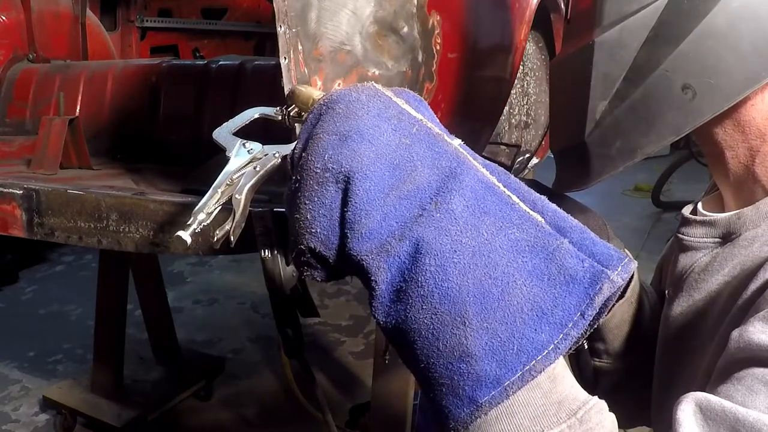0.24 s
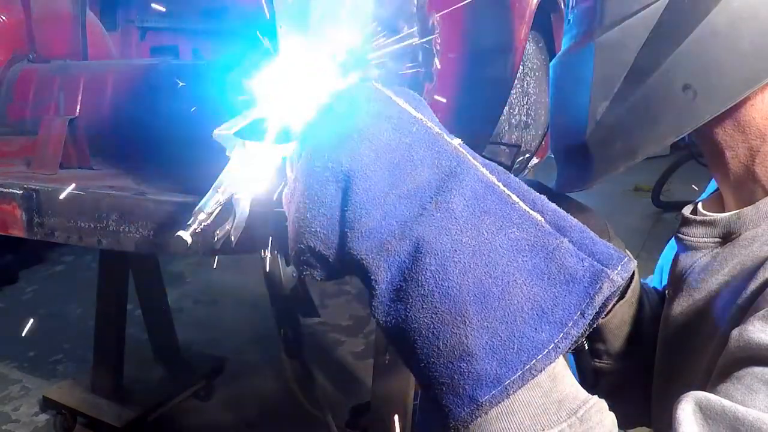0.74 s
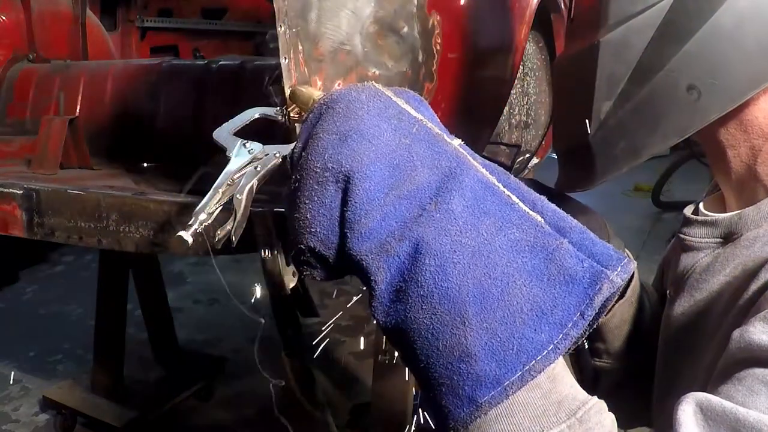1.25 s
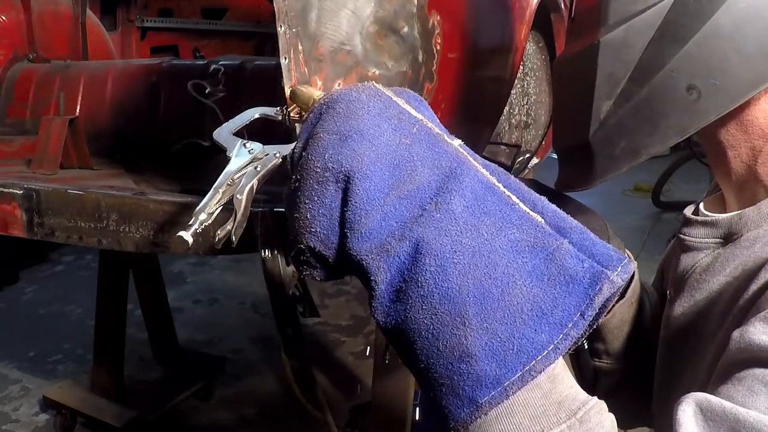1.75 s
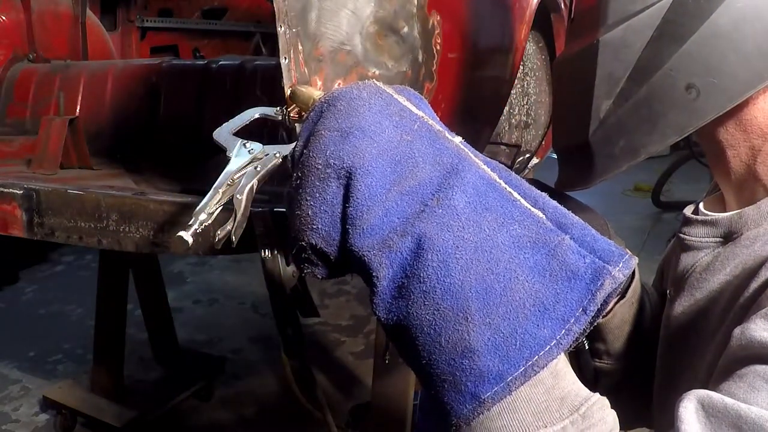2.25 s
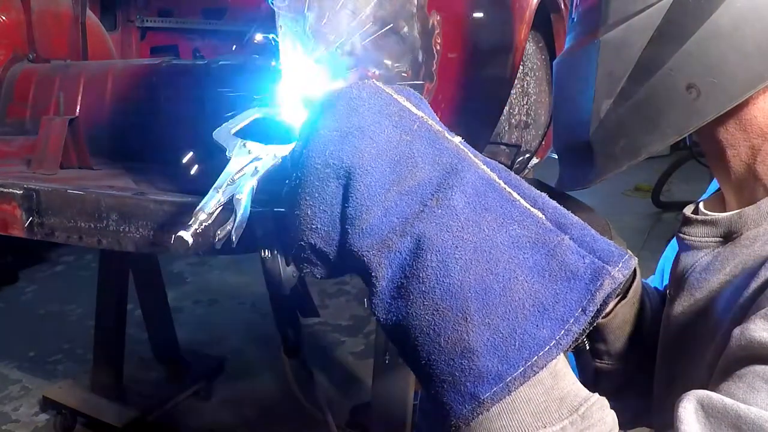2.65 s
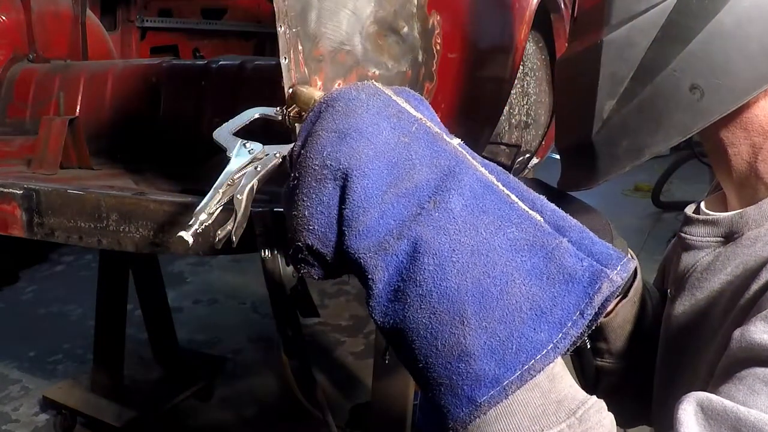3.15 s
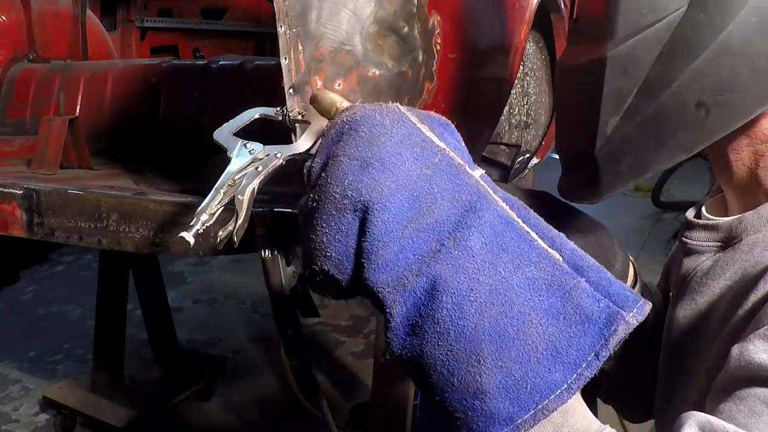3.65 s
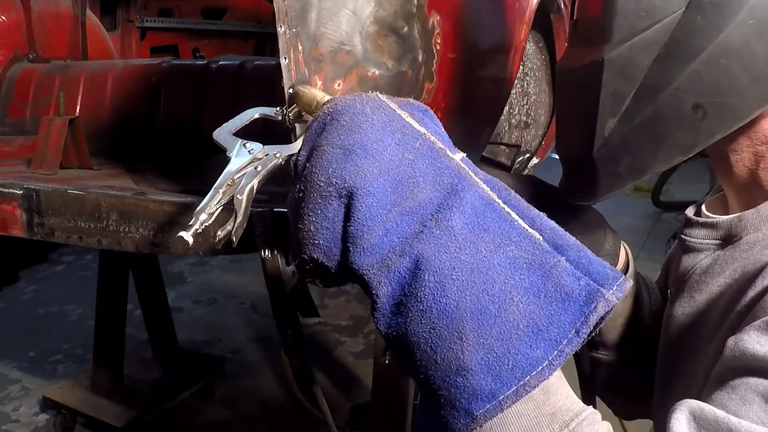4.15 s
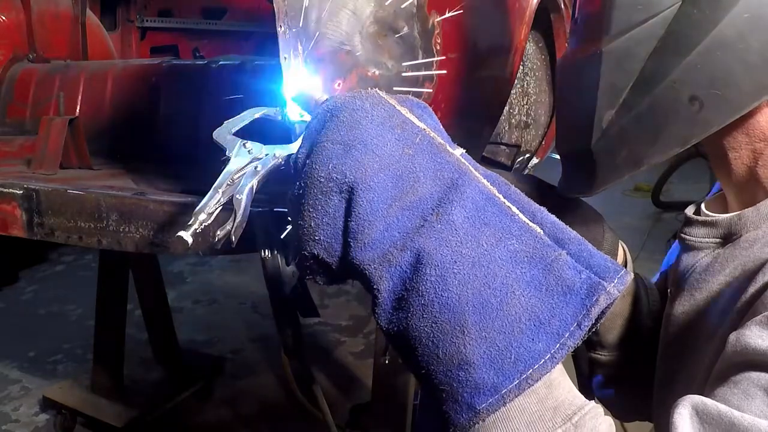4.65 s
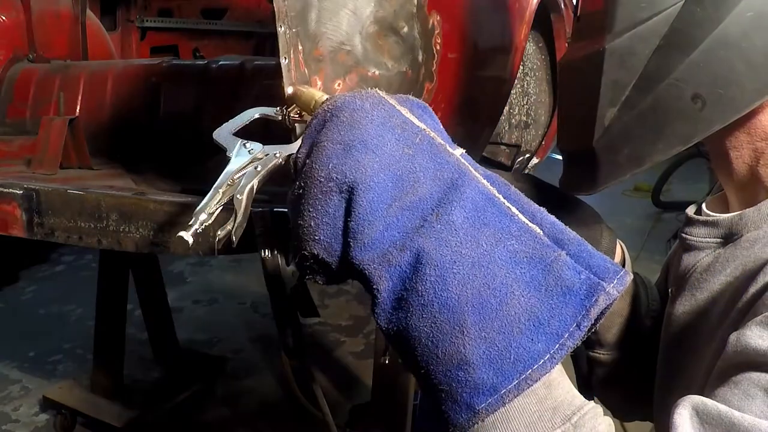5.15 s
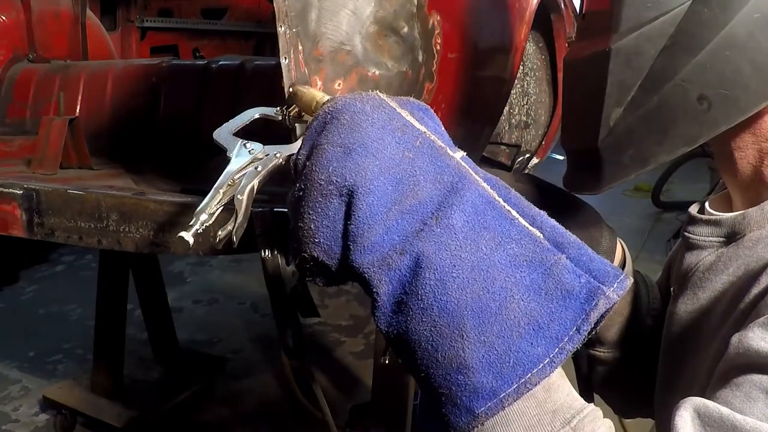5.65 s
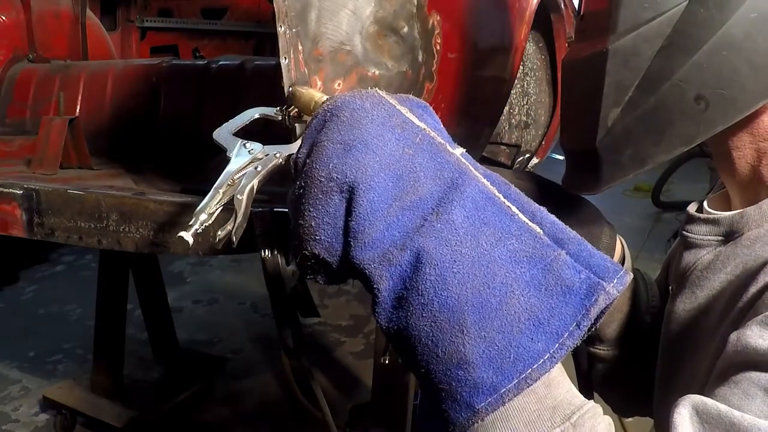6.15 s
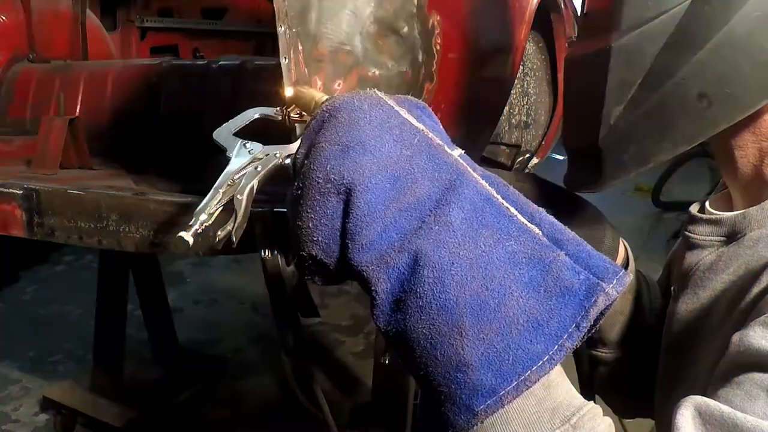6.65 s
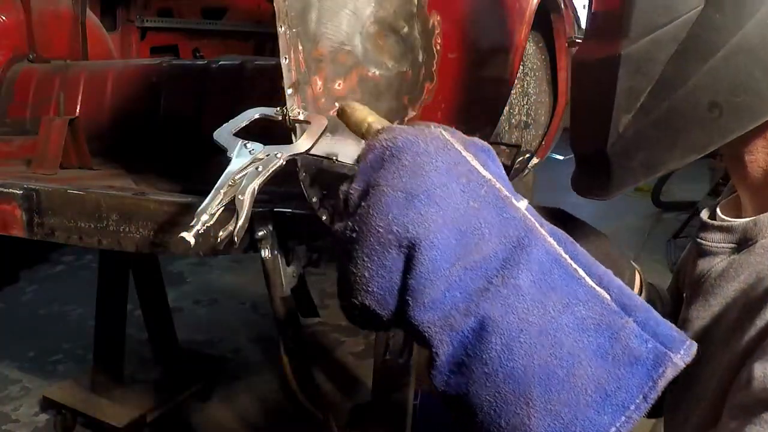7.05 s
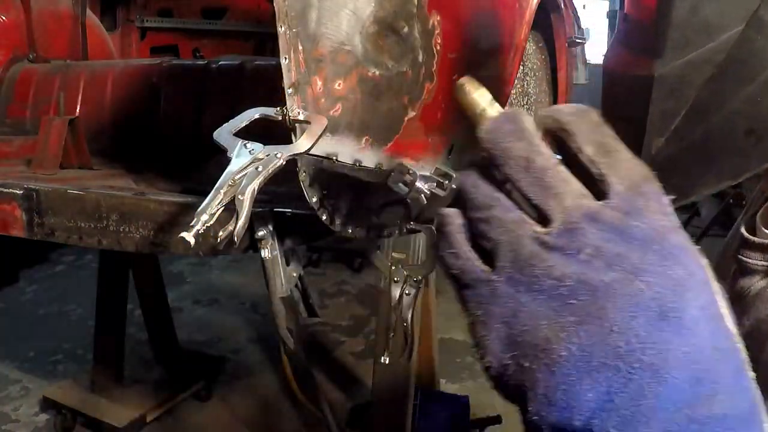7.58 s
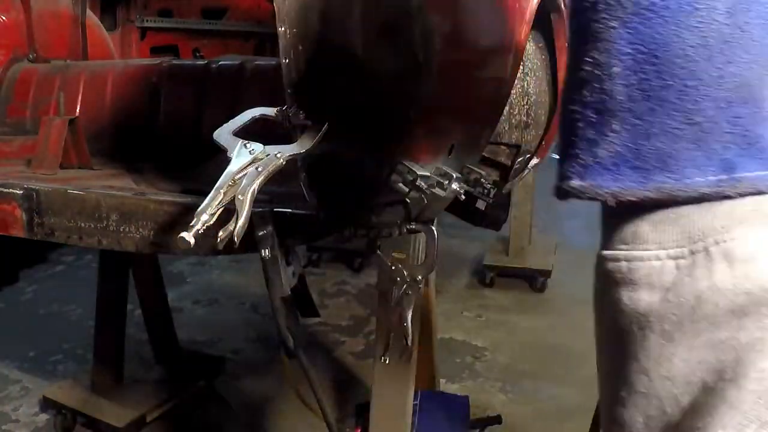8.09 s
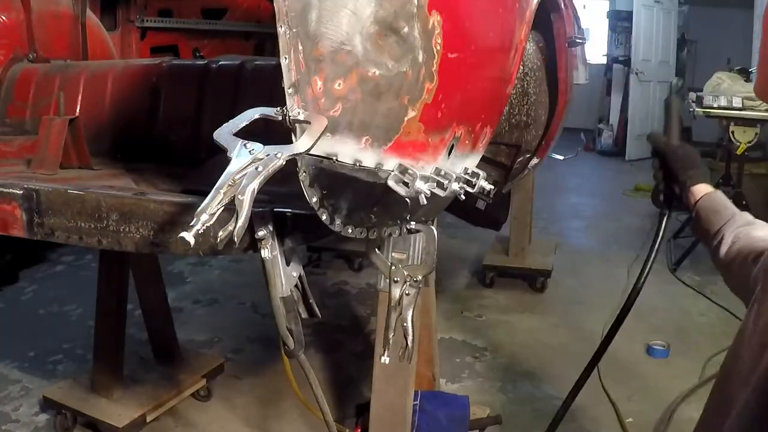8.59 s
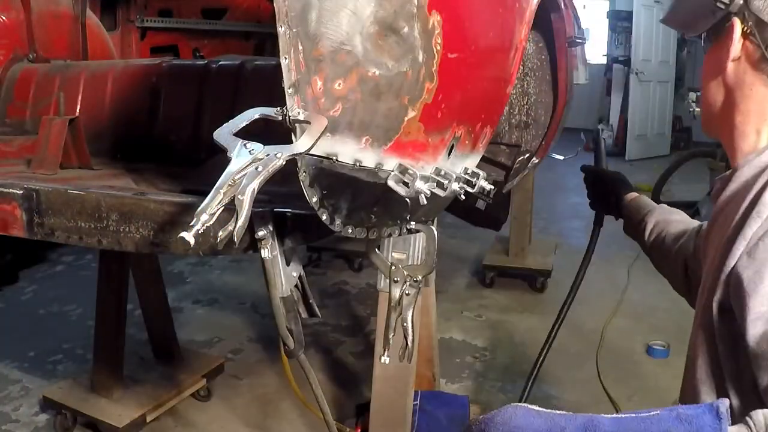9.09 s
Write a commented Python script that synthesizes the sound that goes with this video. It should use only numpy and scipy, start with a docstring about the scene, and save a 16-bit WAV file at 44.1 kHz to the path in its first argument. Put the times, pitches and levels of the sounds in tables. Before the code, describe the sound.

A welder strikes four brief arcs on sheet steel, snapping loudly above a humming fan, before a few faint bright clicks as gear is put aside.

```python
"""Four short MIG welds on a steel body panel in a garage, two microphone ports close by, a fan droning throughout.
Each arc strikes with a spit and a throaty flare of shaped noise, then sizzles as its pool heats.
Bursts of noise and damped tones crackle as the wire shorts into the pool; a ringing valve knock ends each weld.
Gain control ducks everything, fan included, under the loud treble of the welds.
At the end the gear clicks as it is put aside: scraped noise, ringing modes and a sharp catch."""
import sys
import numpy as np
from scipy import signal
from scipy.fft import rfft, irfft, next_fast_len
from scipy.io import wavfile
from scipy.ndimage import minimum_filter1d, map_coordinates

SR = 44100
rng = np.random.default_rng(int(sys.argv[2]) if len(sys.argv) > 2 else 0)


def output_pcm(signal):
    """Save a mono or channel-first signal as 16-bit PCM at the path in sys.argv[1].

    Samples are clipped to [-1, 1] before scaling.
    """
    pcm = np.clip(np.atleast_2d(signal).T, -1, 1) * 32767
    wavfile.write(sys.argv[1], SR, np.round(pcm).astype(np.int16))


N = 411144  # length in samples

# Weaker tones of the fan and its casing. Each row: frequency in Hz, level in dB.
FAN_TONES = [(339, -31), (386, -27.5), (587, -27.5), (622, -30.5), (689, -37), (775, -29), (964, -40),
             (1217, -58.5), (1308, -51.5), (1519, -60)]
# Rushing air of the fan. Each row: frequency in Hz, level in dB per Hz.
FAN_AIR = [(25, -65.5), (128, -68.5), (168, -39), (230, -41.5), (400, -45), (480, -48), (610, -40),
           (780, -47), (900, -55.5), (1150, -63.5), (1600, -72), (2500, -85.5), (4500, -88.5),
           (7000, -91.5), (8500, -96.5), (10500, -98), (13500, -115)]
# Slow swell and ebb of the fan's drone. Each row: time in seconds, change in dB.
DRONE_SWELL = [(0.3, -1.5), (1.5, -3.5), (2, -1), (2.25, 1), (2.6, -0.5), (3.6, 0), (4.3, 1), (5, 1),
               (5.5, -1), (6.1, -2), (6.45, 0.5), (8, 0)]
# Likeness of diffuse sound at the two ports. Each row: frequency in Hz, left-right correlation.
PORT_LIKENESS = [(80, 0.84), (190, 0.75), (600, 0.97), (2000, 0.08), (4000, 0.39), (7000, 0.061)]
# Decay of the garage. Each row: frequency in Hz, t60 in seconds.
GARAGE_DECAY = [(150, 0.42), (1000, 0.83), (4000, 0.49), (7000, 0.51), (9500, 0.4), (14000, 0.41)]
# Small ratcheting clicks as the gear is put aside. Each row: start in seconds, level in dB.
CLICKS = [(7.809, -45), (8.012, -45), (8.05, -47), (8.095, -42.5), (8.288, -38), (8.536, -38),
          (8.571, -40.5), (8.605, -42.5)]
# High modes that ring in a click. Each row: frequency in Hz, level in dB, t60 in seconds.
CLICK_MODES = [(3500, 4.5, 0.044), (6020, 9.5, 0.1), (7200, -2, 0.07), (7500, 1, 0.1)]
# The welder's case, knocked by the gas valve. Each row: frequency in Hz, level in dB, t60 in seconds.
CASE_MODES = [(337, -7, 0.27), (417, -3, 0.14), (451.5, -1, 0.085), (702, -15.5, .2), (1690, -21, .17),
              (1800, -24, .2)]
# Low thuds of the panel near some of the snaps. Each row: start in seconds, level in dB.
THUDS = [(0.553, -5), (0.615, -7), (0.674, 1), (2.468, -14.5), (2.574, -7), (4.764, -12), (6.279, -8),
         (6.413, -12)]
# Dull splutters of molten metal while the pool is still cold. Each row: start in seconds, level in dB.
SPLUTTERS = [(0.4713, -19), (0.477, -16.5), (0.4814, -19.5), (0.5647, -22.5), (0.5745, -15.5),
             (2.403, -24.5), (4.649, -23), (6.179, -19), (6.19, -25)]
# The welds. Each row: arc start and arc stop in seconds, flare length in seconds, flare level in dB,
# spit level in dB, time to heat the pool in seconds, then sizzle, whistle, gas puff and valve knock in dB.
WELDS = [(0.401, 1.029, 0.08, -26.5, -22.5, 0.26, -26.5, -49, -2, -5),
         (2.371, 2.732, 0.02, -19.5, -23.5, 0.19, -37.5, -55, 2, -5.5),
         (4.603, 5.001, 0.11, -24, -21, 0.1, -32.5, -33.5, -1.5, -7.5),
         (6.139, 6.549, 0.044, -20, -21.5, 0.26, -41, -46.5, 0, -3.5)]
# The hollow of the nozzle, rung by the flaring arc. Each row: frequency in Hz, width in Hz, level in dB.
NOZZLE_MODES = [(590, 120, -4), (930, 190, -4.5), (1280, 140, -6.5), (1580, 130, -9.5), (4320, 200, -12),
                (5300, 370, -13.5)]
# The arc heard from between nozzle and panel. Each row: frequency in Hz, gain in dB.
ARC_COLOUR = [(70, -39), (170, 0), (600, 8), (1200, 0.5), (1950, 3.5), (2450, -6.5), (3100, -1.5),
              (3900, -1.5), (5200, 2), (7000, 3.5), (8100, -9.5), (9300, -4.5), (11900, -14.5),
              (14000, -14), (16000, -30)]
# Snaps as the wire shorts into the pool and blows clear. Each row: start in seconds, level in dB.
SNAPS = [(0.4881, -8.5), (0.555, 1), (0.5652, -9.5), (0.6173, -1), (0.6338, 1), (0.646, -7.5),
         (0.672, -6.5), (0.6767, -1), (0.6832, 3.5), (0.6902, 0), (0.7647, 5.5), (0.811, -1.5),
         (0.8367, -1), (0.8432, -2), (0.8554, -1.5), (0.8636, -4.5), (0.8717, 1), (0.8833, -2), (0.887, 1),
         (0.937, -10.5), (0.944, -8), (0.954, -9.5), (0.9671, 4), (0.9744, 0.5), (1.0236, 4), (1.076, -12),
         (2.4126, -1.5), (2.47, 1.5), (2.4946, 3.5), (2.5613, 3), (2.5776, 1.5), (2.5816, -1), (2.5964, 2),
         (2.6007, -5.5), (2.6216, 0), (2.6334, 3), (2.6556, -3.5), (2.6676, 5.5), (2.6804, -0.5),
         (2.6925, 2), (2.7048, 5), (2.7182, 4), (2.7317, 2), (4.662, -6.5), (4.7673, 3), (4.7794, -6.5),
         (4.7841, -10), (4.7953, -4), (4.807, -2.5), (4.8247, -5.5), (4.8309, 5), (4.8821, 2),
         (4.9027, 2.5), (4.908, 3.5), (4.9219, 5.5), (4.935, 3), (4.948, 4), (4.9628, 4), (4.9822, -0.5),
         (4.9973, -2.5), (6.2078, -6.5), (6.2263, 1), (6.2882, -1), (6.304, -2), (6.323, -1.5),
         (6.369, -3.5), (6.3811, 0), (6.3874, -4.5), (6.4232, 0), (6.4323, -2), (6.4417, -6),
         (6.4506, -5.5), (6.4591, -7), (6.4773, -1), (6.4994, -8), (6.5136, -2.5), (6.5208, -1.5),
         (6.535, -7), (6.5493, -4)]
# Left microphone port against the right. Each row: frequency in Hz, gain in dB.
PORT_GAIN = [(110, 0), (195, -2), (380, -6), (620, -18), (800, -11), (1200, -4), (1900, 0), (2500, 3),
             (3500, 0), (5200, -2), (6900, 2), (10000, -1)]
# Left microphone port against the right. Each row: frequency in Hz, phase lead in radians.
PORT_LEAD = [(200, 0), (430, -.3), (780, -3.7), (1890, -5.6), (2580, -6.1), (4500, -6.3), (6400, -4.8),
             (7100, -6.7), (7900, -4.7), (13000, -6.5)]


def amp(db):
    """Decibels to gain."""
    return 10 ** (np.asarray(db) / 20)


def fade(db, t60, t):
    """Gain that starts at a level in dB and dies by 60 dB in t60 seconds."""
    return amp(db - 60 * t / t60)


def unit(x):
    """x at rms 1."""
    return x / np.sqrt(np.mean(x ** 2) + 1e-20)


def along(points, hz):
    """(Hz, value) points read on a log frequency axis."""
    f, v = np.transpose(points)
    return np.interp(np.log(hz + 1), np.log(f + 1), v)


def wobble(rate):
    """A smooth random curve with rate knots a second."""
    knots = rng.standard_normal(int(N * rate / SR) + 4)
    return map_coordinates(knots, [np.arange(N) * rate / SR])


def filtered(x, response):
    """x through a complex response of frequency."""
    n = x.shape[-1]
    padded = next_fast_len(n + SR // 2)
    spectrum = rfft(x, padded) * response(np.fft.rfftfreq(padded, 1 / SR))
    return irfft(spectrum, padded)[..., :n]


def causal(points, size=2048):
    """The minimum-phase impulse response of a (Hz, dB) colour."""
    cepstrum = irfft(np.log(amp(along(points, np.fft.rfftfreq(size, 1 / SR)))))
    fold = np.r_[1, np.full(size // 2 - 1, 2), np.zeros(size // 2)]
    return irfft(np.exp(rfft(cepstrum * fold)))


def resonance(f, hz, width):
    """Response of one damped mode, width in Hz."""
    return 1j * f * width / (hz * hz - f * f + 1j * f * width)


def coloured_noise(n, response):
    """White noise through a response, at rms 1."""
    return unit(filtered(rng.standard_normal(n), response))


def diffuse(n):
    """White noise from all sides: mostly alike at both ports in the bass, much less so in the treble."""
    def split(f):
        turn = np.arccos(np.clip(along(PORT_LIKENESS, f), -1, 1)) / 2
        return np.array([np.cos(turn), np.sin(turn)])
    mid, side = filtered(rng.standard_normal((2, n)), split)
    return np.array([mid + side, mid - side])


def add(track, s, sound):
    """Mix a sound into the track at s seconds."""
    part = track[round(s * SR):][:len(sound)]
    part += sound[:len(part)]


def garage(x, delay_s=.004):
    """Hard walls answer after a short delay; each frequency dies at its own speed."""
    hz, t, bins = signal.stft(diffuse(SR), SR, nperseg=256)
    decay = fade(0, along(GARAGE_DECAY, hz)[:, None], t)
    tail = signal.istft(bins * decay, SR, nperseg=256)[1]
    late = np.pad(x, (round(delay_s * SR), 0))
    return signal.fftconvolve(late[None], tail / np.linalg.norm(tail[0]), axes=1)[:, :N]


def panels(x, echo_db=-23, count=10):
    """Nearby steel throws back a few copies within 1 to 20 ms, different at each port."""
    echoes = np.zeros((2, SR // 50))
    for port in echoes:
        delays = rng.integers(SR // 1000, SR // 50, count)
        port[delays] = amp(echo_db) * rng.choice([-1, 1], count)
    return signal.fftconvolve(x[None], echoes, axes=1)[:, :N]


def fan(drone_hz=192.4, drone_db=-13, drift_rad=0.53, boom_hz=189, boom_width=40, boom_db=-2.5,
        blur_rad=0.92, blur_rate=16):
    """A wavering blade tone over the casing's booming resonance, weaker blurred tones and rushing air."""
    t = np.arange(N) / SR
    tone = np.sqrt(2) * np.sin(2 * np.pi * drone_hz * t + drift_rad * wobble(8.5))
    boom = coloured_noise(N, lambda f: resonance(f, boom_hz, boom_width) ** 3)
    swell_db = np.interp(t, *np.transpose(DRONE_SWELL))
    drone = amp(drone_db + swell_db) * (tone + amp(boom_db) * boom)
    tones = np.zeros(N)
    for hz, db in FAN_TONES:
        tones += amp(db) * np.sqrt(2) * np.sin(2 * np.pi * hz * t + blur_rad * wobble(blur_rate))
    air = filtered(diffuse(N), lambda f: amp(along(FAN_AIR, f)) * np.sqrt(SR / 2))
    return drone + tones + air


def clicks(scrape_db=-1, scrape_t60=0.18, scrape_hz=4600, scrape_width=15000, grain_db=4, ring_db=-7,
           rise_s=0.0026, catch_s=0.012, catch_db=16, catch_hz=7150, catch_t60=.005):
    """A small catch scrapes over a tooth, ringing a few high modes, and snaps home a moment later."""
    out, t = np.zeros(N), np.arange(SR // 3) / SR
    for s, db in CLICKS:
        ring = np.zeros(len(t))
        for hz, level, t60 in CLICK_MODES:
            ring += fade(level, t60, t) * coloured_noise(len(t), lambda f: resonance(f, hz, 250) ** 2)
        scrape = coloured_noise(len(t), lambda f: resonance(f, scrape_hz, scrape_width) ** 4)
        scrape *= fade(scrape_db, scrape_t60, t) * amp(grain_db * wobble(600)[:len(t)])
        add(out, s, amp(db) * np.minimum(t / rise_s, 1) * (amp(ring_db) * ring + scrape))
        catch = np.minimum(t / .0003, 1) * np.sin(2 * np.pi * catch_hz * t)
        add(out, s + catch_s, fade(db + catch_db, catch_t60, t) * catch)
    return filtered(out, lambda f: 1 / (1 + (f / 13000) ** 12))  # soften the extreme treble


def valve(lag_s=0.036, rise_s=0.008, t60=0.25, body_hz=420, width_hz=400, thump_db=-5):
    """Just after the arc the gas valve shuts with a dull knock, and the welder's case rings."""
    out, t = np.zeros(N), np.arange(SR // 3) / SR
    for _, off, *_, db in WELDS:
        knock = coloured_noise(len(t), lambda f: resonance(f, body_hz, width_hz) ** 3)
        knock *= fade(thump_db, t60, t)
        ring = np.zeros(len(t))
        for hz, level, life in CASE_MODES:
            ring += fade(level, life, t) * np.sin(2 * np.pi * hz * t + wobble(70)[:len(t)])
        add(out, off + lag_s, amp(db) * np.minimum(t / rise_s, 1) * (knock + ring))
    return out


def thuds(start_hz=180, end_hz=135, sag_s=0.027, rise_s=.008, t60=.11):
    """The panel is shoved: a short thud that sags in pitch."""
    out, t = np.zeros(N), np.arange(SR // 5) / SR
    pitch = end_hz + (start_hz - end_hz) * np.exp(-t / sag_s)
    phase = 2 * np.pi * np.cumsum(pitch) / SR
    for s, db in THUDS:
        add(out, s, fade(db, t60, t) * np.minimum(t / rise_s, 1) * np.sin(phase))
    return out


def splutters(centre_hz=1930, width_hz=450, t60=0.011):
    """A drop of metal bursts slowly: a short, dull spurt of noise."""
    out, t = np.zeros(N), np.arange(SR // 20) / SR
    for s, db in SPLUTTERS:
        spurt = coloured_noise(len(t), lambda f: resonance(f, centre_hz, width_hz))
        add(out, s, fade(db, t60, t) * spurt)
    return out


def sparks(per_s=200, scatter_db=5):
    """Tiny ticks of spatter at random moments, of very uneven size, at rms 1."""
    hits = rng.random(N) < per_s / SR
    sizes = amp(scatter_db * np.clip(rng.standard_normal(N), -2, 2))
    return unit(hits * rng.choice([-1, 1], N) * sizes)


def arc(spit_s=0.02, rise_s=0.0075, grain_db=4, flutter_db=5, whistle_hz=1540, sing_s=.042,
        thump_db=-2, thump_hz=550, spark_share=.6):
    """The arc lights with a spit, flares until the wire reaches the pool, and sizzles as the pool heats."""
    t = np.arange(N) / SR
    spit, flare, sizzle, whistle = np.zeros((4, N))  # level curves
    for on, off, length, flare_db, spit_db, heat_s, sizzle_db, whistle_db, *_ in WELDS:
        age = np.maximum(t - on, 0)
        lit = np.minimum(age / rise_s, 1) * (t < off)
        open_arc = lit * np.clip((length - age) / rise_s + 1, 0, 1)
        spit += amp(spit_db) * lit * np.exp((rise_s - age) / spit_s)
        flare += amp(flare_db) * open_arc
        sing_end = length + sing_s  # a long arc starts to sing
        whistle += amp(whistle_db) * lit * (age < sing_end) * (age / sing_end) ** 2
        sizzle += amp(sizzle_db) * lit * np.minimum(age / heat_s, 1) ** 2
    hiss = coloured_noise(N, lambda f: resonance(f, 4900, 2000) - 0.98 * resonance(f, 1200, 1000))
    throat = coloured_noise(N, lambda f: (resonance(f, 530, 1000) - 0.25 * resonance(f, 1400, 1000)
                                          + 0.028 * resonance(f, 4300, 7000)))
    grains = unit(rng.standard_normal(N) * amp(grain_db * wobble(900)))
    # the share divides the sizzle's power between separate sparks and grainy noise
    frying = np.sqrt(1 - spark_share) * grains + np.sqrt(spark_share) * sparks()
    hollow = np.zeros(N)
    for hz, width, db in NOZZLE_MODES:
        hollow += amp(db) * coloured_noise(N, lambda f: resonance(f, hz, width) ** 2)
    singing = np.sqrt(2) * np.sin(2 * np.pi * whistle_hz * t + wobble(130)) * amp(2 * wobble(120))
    thump = amp(thump_db) * coloured_noise(N, lambda f: resonance(f, thump_hz, 730) ** 2)
    coarse = unit(amp(grain_db * wobble(260)))
    roar = unit(throat * amp(flutter_db * wobble(220)) + hollow)
    return spit * coarse * (hiss + thump) + flare * roar + sizzle * frying + whistle * singing


def snaps(crack_db=15, spatter_db=-14.0, spatter_t60=0.004, zing_hz=6500, zing_t60=0.0009,
          puff_db=7.0, puff_hz=500, puff_t60=0.0021, push_db=-15, push_hz=170, push_t60=0.025):
    """Every short bursts like a fuse: a sharp crack with spatter, a zing, a gas puff, a low panel push."""
    out, t = np.zeros(N), np.arange(SR // 10) / SR

    def ring(hz, t60, spread):
        """A damped tone, its pitch scattered from snap to snap."""
        pitch = hz * np.exp(spread * rng.standard_normal())
        return np.sin(2 * np.pi * pitch * t) * fade(0, t60, t)

    for s, db in SNAPS:
        gas_db = [gas for on, *_, gas, _ in WELDS if on < s][-1]  # from the latest weld
        crack = rng.standard_normal(len(t)) * fade(spatter_db, spatter_t60, t)
        crack[:3] = -.7, -.7, -.1  # the sharp front, ahead of the spatter
        zing = ring(zing_hz, zing_t60, 0.18)
        puff = amp(puff_db + gas_db) * ring(puff_hz, puff_t60, 0.18)
        push = amp(push_db + gas_db) * ring(push_hz, push_t60, .2)
        add(out, s, amp(db) * (amp(crack_db) * crack + zing - puff + push))
    return out


def scene():
    """Snaps and clicks are near and sharp; arc and valve arrive more by way of panels and walls."""
    def colour(x):
        return signal.oaconvolve(x, causal(ARC_COLOUR))[:N]
    near = colour(snaps() + splutters()) + thuds() + clicks()
    far = colour(arc()) + valve()
    early = panels(near + amp(11) * far)
    late = garage(amp(-3.5) * near + amp(-1.5) * far)
    return near + far + early + late + fan()


def gain_control(x, top_db=-24.0, window_s=0.034, attack_s=0.017, release_s=1.11, size=64, count=50):
    """The gain sinks quickly while the treble is loud, holds a moment and creeps back afterwards."""
    treble = filtered(x, lambda f: f > 1500)
    share = 1 / (window_s * SR)
    power = signal.lfilter([share], [1, share - 1], np.mean(treble ** 2, axis=0))
    needed = np.minimum(1, amp(top_db) / np.sqrt(power[::size] + 1e-12))  # one step per size samples
    held = minimum_filter1d(needed, 2 * count + 1, origin=count)  # the lowest of the recent steps
    gains = [1]
    for wanted in held:
        lag = attack_s if wanted < gains[-1] else release_s
        gains.append(gains[-1] + (wanted - gains[-1]) * size / (lag * SR))
    return x * np.interp(np.arange(N), np.arange(len(gains)) * size, gains)


def record(dry, clip_level=.95, top_hz=16700):
    """Two unlike microphone ports, gain control, soft clipping and the band limit."""
    left = filtered(dry[0], lambda f: amp(along(PORT_GAIN, f)) * np.exp(1j * along(PORT_LEAD, f)))
    x = gain_control(np.array([left, dry[1]]))
    x = x / (1 + np.abs(x / clip_level) ** 4) ** (1 / 4)
    return filtered(x, lambda f: np.clip((top_hz - f) / 1500, 0, 1) ** 2)


dry = scene()
out = record(dry)
output_pcm(out)
```